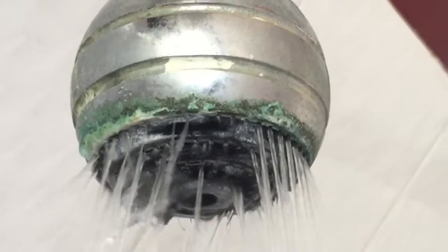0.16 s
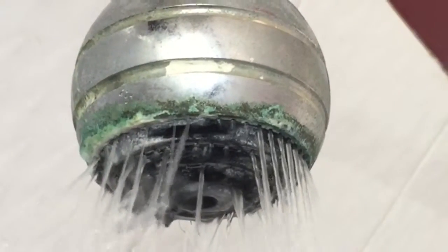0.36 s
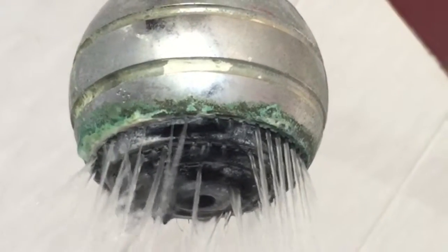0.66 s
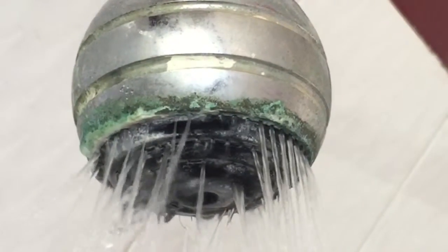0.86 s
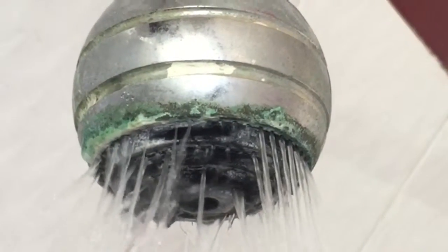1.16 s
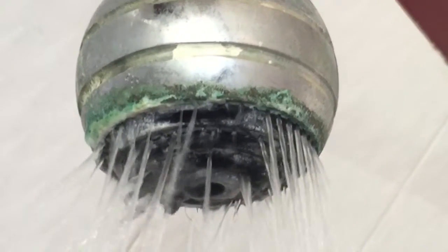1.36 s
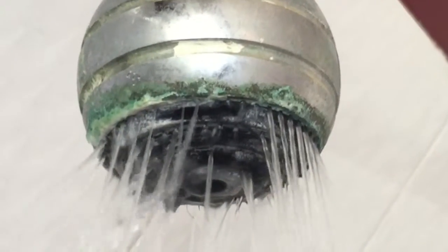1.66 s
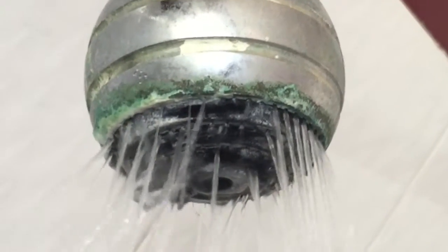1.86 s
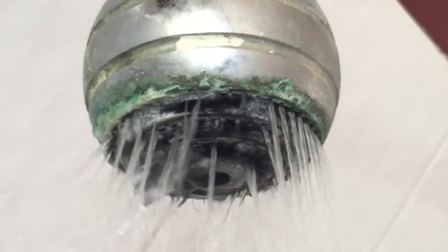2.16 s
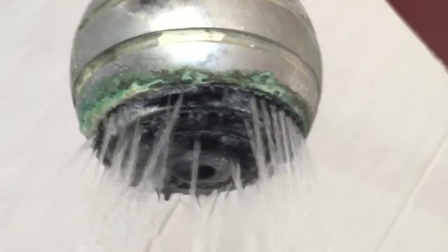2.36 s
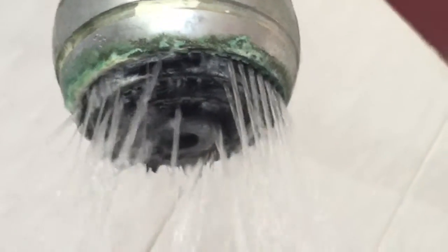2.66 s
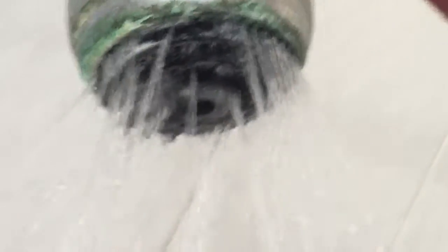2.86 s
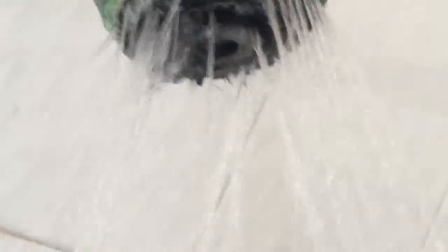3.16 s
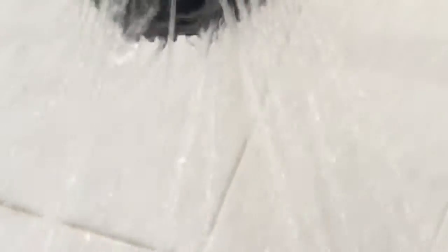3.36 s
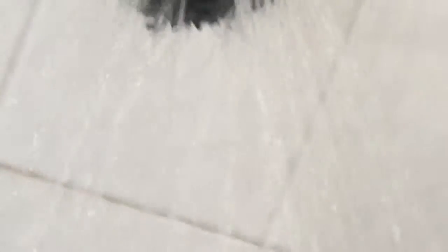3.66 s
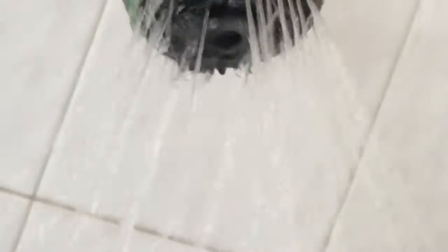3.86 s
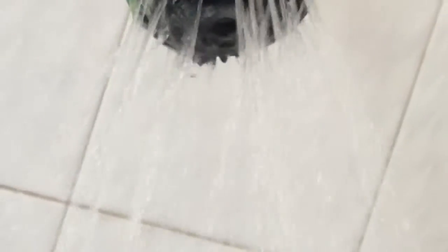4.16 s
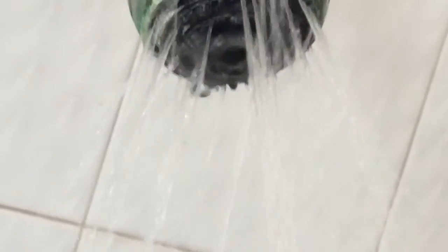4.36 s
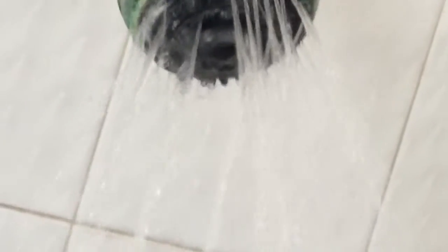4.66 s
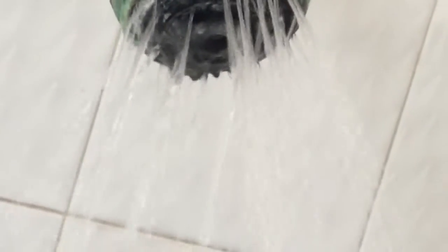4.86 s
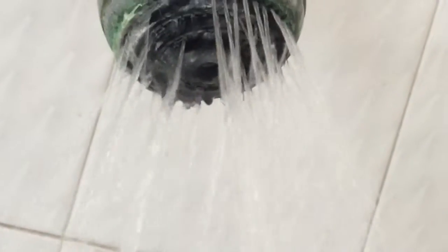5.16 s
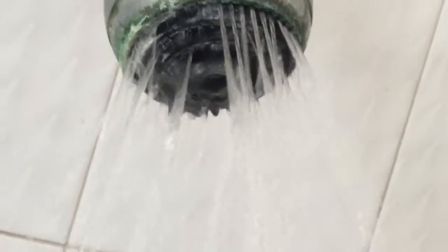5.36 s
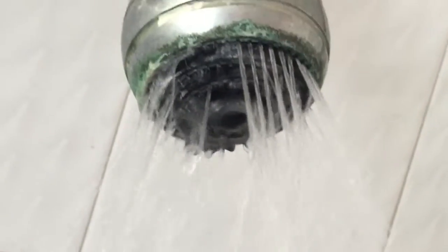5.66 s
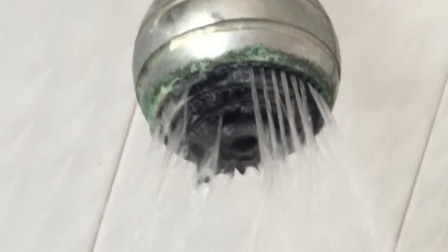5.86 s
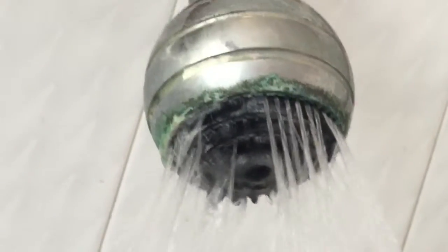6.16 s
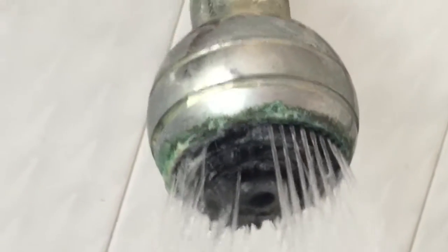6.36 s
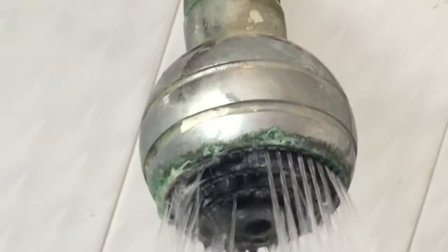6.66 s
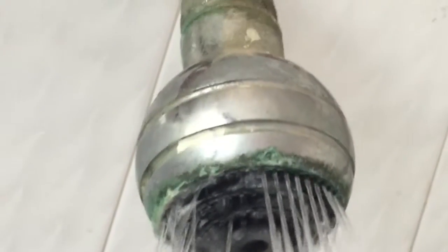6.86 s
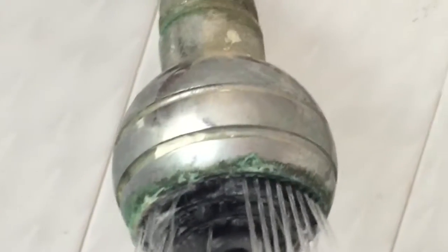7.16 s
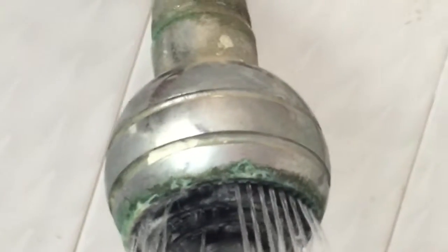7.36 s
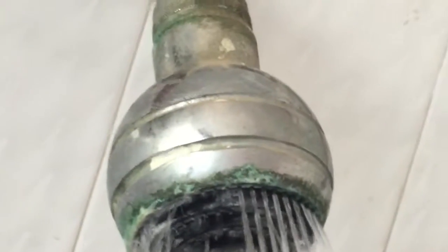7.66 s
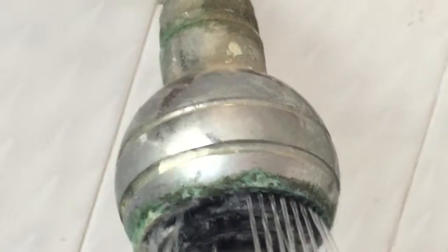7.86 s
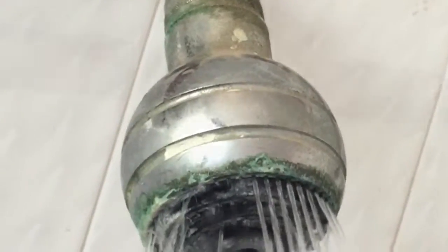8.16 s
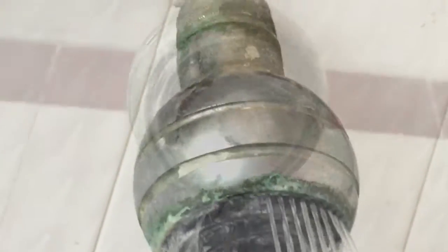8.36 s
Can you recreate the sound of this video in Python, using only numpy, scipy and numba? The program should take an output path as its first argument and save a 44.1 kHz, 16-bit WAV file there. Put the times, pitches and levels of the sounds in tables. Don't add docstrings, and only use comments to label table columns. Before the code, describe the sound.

Bright, hissing shower spray runs nonstop with sputtering bubbles, tiny crackles and a soft low drumming of water on a hard bathroom floor.

```python
import sys
import numpy as np
from scipy import signal
from scipy.fft import rfft, irfft
from scipy.io import wavfile
from scipy.ndimage import map_coordinates
from numba import njit

SR = 44100
rng = np.random.default_rng(int(sys.argv[2]) if len(sys.argv) > 2 else 0)


def amplitude_ratio(level_db):
    exponent = np.asarray(level_db, float) / 20
    return 10 ** exponent


def wrap_up_sound(samples):
    columns = np.atleast_2d(samples).T
    tamed = np.clip(columns, -1, 1)
    steps = np.round(tamed * 32767).astype(np.int16)
    wavfile.write(sys.argv[1], SR, steps)


N = 375732


def level(x, db):
    return x * amplitude_ratio(db) / np.sqrt(np.mean(x ** 2))


def band(x, hz, width_hz):
    return signal.lfilter(*signal.iirpeak(hz, hz / width_hz, fs=SR), x)


def highpass(x, order, hz):
    return signal.sosfilt(signal.butter(order, hz, "high", fs=SR, output="sos"), x)


def curve(table):
    s, *columns = np.transpose(table)
    return [np.interp(np.arange(N) / SR, s, c) for c in columns]


def wander(count):
    return np.interp(np.arange(N), np.linspace(0, N, count), rng.standard_normal(count))


def exponential_luck(uniform, limit):
    return np.minimum(-np.log(1 - uniform), limit)


@njit
def bubbles(length, start, hz, cycles, size, glide):
    out = np.zeros(length + 4096)
    for k in range(len(start)):
        i = int(start[k])
        if i < 0 or i >= length or size[k] < 3e-5:
            continue
        step = hz[k] / SR
        life = min(int(2 * cycles[k] / step) + 2, 4000)
        turn = np.exp(2j * np.pi * step - 3 * step / cycles[k])
        rise = np.exp(2j * np.pi * step * glide / life)
        z = size[k] * np.exp(2j * np.pi * step * (i + 1 - start[k]))
        for j in range(life):
            out[i + 1 + j] += z.imag * min(1., (j + 1) * step)
            z *= turn
            turn *= rise
    return out[:length]


def ring(s, hz, cycles, db, glide):
    hz = np.clip(hz, 500, .4 * SR).ravel()
    return bubbles(N, SR * s.ravel(), hz, cycles * np.ones(hz.size), amplitude_ratio(db).ravel(), glide)


# start in seconds, rise in dB, length in seconds.
DRAIN_SWELLS = [
    (1.092, 14, 0.16),
    (2.79, 14, 0.089),
    (3.2, 7, .45),
    (4.7, 10, 0.5),
    (5.3, 14, 0.08),
    (7.798, 7, 0.14),
]


def drain_pipe():
    s, rise_db, length = np.transpose(DRAIN_SWELLS)[:, :, None]
    part = np.clip((np.arange(N) / SR - s) / length, 0, 1)
    swell_db = (rise_db * np.sqrt(np.abs(np.sin(np.pi * part)))).sum(axis=0)
    hum = band(rng.standard_normal(N), 620.5, 16)
    return level(hum, -10.0) * amplitude_ratio(-54 + swell_db)


# frequency in Hz, width in Hz, level in dB.
ROOM_MODES = [(68, 8.4, -64), (95.4, 45, -52.5), (102, 38, -62.5), (134, 13, -93), (158.1, 7.5, -53),
              (180, 9.4, -65), (196.5, 23, -56), (214.5, 4.9, -60.5), (269.3, 20, -68.5),
              (294.5, 12, -65.5), (321.6, 18.4, -62)]
# time in seconds, level in dB.
DRUM = [(0.0, -47.5), (0.55, -49.5), (0.62, -53), (0.78, -46), (1.07, -51), (1.9, -45.5), (1.92, -51),
        (5.1, -49), (5.6, -54), (6.05, -46.5), (6.19, -52.5), (6.57, -49.5), (8.16, -49), (8.52, -54.5)]


def room_modes():
    weight_db, = curve(DRUM)
    weight_db = weight_db - weight_db.mean()
    low = amplitude_ratio(weight_db + 1.0 * wander(count=24))
    high = amplitude_ratio(weight_db + 1.0 * wander(count=24))
    out = np.zeros(N)
    for hz, width_hz, db in ROOM_MODES:
        noise = rng.standard_normal(N)
        mode = band(band(noise, hz, width_hz), hz, 2 * width_hz)
        out += (low if hz < 125 else high) * level(mode, db)
    return out


# frequency in Hz, density in dB per Hz.
RUMBLE = [(15, -54), (25, -2.5), (80, -6.5), (167, -2), (207, -5.5), (256, -3.5), (323, -27.5), (366, -6.5),
          (505, -8), (615, -5), (819, -8.5), (1710, -10.5), (1800, -10), (2340, -6.5), (3960, -120)]


def floor_drumming():
    hz, db = np.transpose(RUMBLE)
    f = np.arange(N // 2 + 1) * SR / N + 1
    colour = amplitude_ratio(np.interp(np.log(f), np.log(hz), db))
    broad = irfft(rfft(rng.standard_normal(N)) * colour, N)
    patter = highpass(broad, 2, 750)
    flow, coarse = curve(FLOW)
    uneven_db = 0.27 * (flow - flow.mean() + 2 * coarse) + 3.0 * wander(count=50)
    broad = broad + patter * (amplitude_ratio(uneven_db - 4.0) - 1)
    return level(broad, -49.5)


# time in seconds, flow in dB, coarseness of the drops in dB.
FLOW = [(0.0, -30, 7), (0.38, -36, 3.5), (0.76, -33, 4), (1.47, -30, 4), (1.87, -31.5, 2.5), (2.49, -29, 6),
        (2.75, -33.5, 4), (2.92, -33, 2), (3.13, -29, 4.5), (3.92, -34, 5), (4.39, -30.5, 4.5),
        (4.77, -32.5, 3.5), (5.62, -33, 2.5), (5.74, -29, 0), (6.36, -31.5, 6.5), (6.9, -31.5, 2),
        (7.43, -31.5, 5), (8.52, -32.5, 3)]
JET_HZ = [1200, 2900, 5800, 12000]


def jets(count=170000):
    when, pitch, size = rng.random((3, count))
    octave = np.log2(1000) + 4.0 * pitch ** .75
    flow, coarse = (c - c.mean() for c in curve(FLOW))
    sample = (when * N).astype(int)

    def layer(mean_db, per_coarse):
        layer_db = mean_db + per_coarse * coarse + flow - wander(count=40)
        return layer_db[sample]

    splash, spray, mist = layer(-40, 2.2), layer(-28, 1), layer(-24.5, -.4)
    rows = np.array([splash - 10, splash - 3, spray - 3, mist - 2.5])
    place = np.interp(octave, np.log2(JET_HZ), np.arange(4))
    db = map_coordinates(rows, [place, np.arange(count)], order=1)
    luck_db = 2.67 * exponential_luck(size, 5.0)
    return ring(when * N / SR, 2 ** octave, 4.7, db - 6.5 + luck_db, 0.096)


def spits(table, mist_db, spread, cycles, glide, count):
    s, db, hz, t60 = np.transpose(table)[:, :, None]
    when, pitch, other, size = rng.random((len(table), 4, count)).transpose(1, 0, 2)
    when = .4 * when ** 1.3
    opening_db = 20 * np.log10(np.minimum(.5 + when / 0.033, 1))
    fade_db = -60 * when / np.clip(t60, .03, 3) + opening_db
    size_db = db + fade_db + 2.7 * exponential_luck(size, 4.5) + 3.5
    bubble_hz = hz * 2 ** (3.04 * spread * (pitch + other - 1))
    ring_db = -10 * np.log10(cycles * count / bubble_hz)
    cloud = ring(s + when, bubble_hz, cycles, size_db + ring_db + 4.5, glide)
    mist = ring(s + 0.000698 + when, 8000 * 2.1 ** pitch, 2.82, size_db + mist_db + 8.5, 0.43)
    return cloud + mist


# start in seconds, level in dB, pitch in Hz, t60 in seconds.
GURGLES = [(.275, -40.5, 2570, .98), (.357, -36.5, 2910, 0.91), (.897, -41, 3020, 0.52),
           (1.499, -40, 2720, 0.72), (1.82, -40, 3400, 0.47), (2.042, -34.5, 2660, 0.85),
           (2.353, -34.5, 2680, 0.55), (2.977, -30, 2650, 0.58), (4.597, -42, 2960, 1),
           (4.141, -36, 3330, .77), (4.456, -35, 1610, 0.047), (5.66, -37.5, 3320, 0.88),
           (6.27, -30, 2550, 0.48), (6.492, -35, 3730, 0.89), (7.1, -48.5, 2370, 0.91)]
# start in seconds, level in dB, pitch in Hz, t60 in seconds.
POCKETS = [(2.366, -37.5, 1265, 0.051), (2.604, -40, 1440, 0.076), (3.335, -45, 940, 0.073),
           (3.35, -48, 1920, 0.36), (3.36, -44.5, 1415, .4), (3.43, -50, 1340, .22),
           (2.795, -41, 3650, 0.54), (3.845, -35, 3040, 0.35), (3.905, -46, 3180, 0.37),
           (4.141, -34.5, 3630, .5), (4.52, -39.5, 1970, 0.048), (6.68, -41, 3970, 0.53),
           (7.722, -42.5, 2530, 0.38), (7.722, -36, 4240, 0.28)]


def gurgles_and_pockets():
    ringing = dict(mist_db=-40, cycles=15.0, glide=.05, count=700)
    gurgles = spits(GURGLES, spread=0.239, **ringing)
    return gurgles + spits(POCKETS, spread=.055, **ringing)


# start in seconds, level in dB, bubble pitch in Hz, t60 in seconds.
COARSE_SPITS = [(.003, -33, 4260, 0.29), (.221, -34.5, 4160, 0.48), (.897, -33, 4060, 0.64),
                (1.499, -36, 4350, 0.67), (1.82, -37, 4950, 0.73), (2.042, -31, 4900, .99),
                (2.48, -33, 3570, 0.6), (2.507, -31, 3900, .99), (3.253, -34, 4840, 0.25),
                (3.765, -39, 4020, 0.98), (4.076, -38.5, 4730, 0.29), (5.08, -31, 6170, 0.7),
                (5.381, -38, 6000, 0.26), (5.651, -35.5, 6300, .99), (6.028, -34, 5050, 0.34),
                (7.099, -40, 4800, 0.48), (7.309, -34, 6200, 0.38), (7.457, -36.5, 6770, 0.76),
                (7.529, -37.5, 4020, 0.82), (7.923, -33.5, 6250, .37)]
# start in seconds, level in dB, bubble pitch in Hz, t60 in seconds.
MIXED_SPITS = [(.085, -37, 4950, .99), (.275, -34, 4100, 1), (.355, -34.5, 4250, 0.99),
               (.439, -34, 4380, 1), (.591, -38, 7700, 1), (1.045, -44, 6300, 0.46),
               (1.179, -35.5, 7900, 0.64), (1.441, -34, 6000, 0.6), (1.57, -37, 6200, 0.99),
               (2.012, -33.5, 5600, 0.92), (2.353, -28.5, 5000, 0.47), (2.792, -38.5, 4170, 0.67),
               (2.934, -40.5, 6400, .96), (2.977, -29.5, 6000, 0.56), (3.628, -41.5, 7400, .55),
               (3.805, -37, 5000, 0.84), (4.908, -38.5, 6100, 0.73), (5.928, -36, 5900, .96),
               (5.959, -34.5, 4540, 0.77), (6.2, -37, 5000, .99), (6.708, -47, 8500, 1),
               (6.82, -45, 5030, 0.41), (7.237, -35, 6000, 0.79), (8.209, -38.5, 5500, .99),
               (8.371, -41, 5000, 0.33)]
# start in seconds, level in dB, bubble pitch in Hz, t60 in seconds.
FINE_SPITS = [(2.408, -39.5, 11700, 0.87), (2.605, -45, 7460, 0.46), (3.331, -43.5, 3560, 0.83),
              (3.474, -40, 7870, .99), (3.738, -36.5, 12500, 1), (3.985, -45, 8500, .55),
              (4.141, -39.5, 6600, .99), (4.456, -32, 13100, .07), (4.457, -35, 6630, 0.23),
              (5.495, -42, 7120, 0.35), (5.612, -39, 6000, 0.48), (6.322, -36, 6100, .39),
              (6.492, -36, 5760, 0.49), (6.674, -39.5, 4330, 0.85), (7.152, -39.5, 6240, 0.51),
              (7.72, -38.5, 6400, 0.82), (7.85, -40, 6150, 0.41), (6.78, -43, 10900, 0.93),
              (6.98, -45, 12000, 0.53), (8.28, -40.5, 9000, 0.34), (8.477, -46, 9500, 0.38)]
# start in seconds, level in dB, bubble pitch in Hz, t60 in seconds.
TIGHT_SPITS = [(.085, -39, 13000, 1), (.591, -39, 9000, .6), (.885, -36.5, 5940, 0.29),
               (1.103, -39, 6200, 0.62), (1.179, -39, 13000, .6), (1.31, -41, 6700, .4),
               (1.441, -45, 8800, .5), (2.53, -40, 6300, .4), (2.605, -23.5, 11800, 0.1),
               (3.02, -38.5, 8800, 0.68), (7.04, -39, 12200, 0.71), (7.07, -42, 5240, 0.45),
               (7.865, -39, 14500, .4), (8.225, -40, 15000, .4), (1.25, -50, 6100, .51),
               (1.361, -34.5, 5100, 0.5), (2.13, -30, 4520, 0.39), (3.44, -43, 4340, 0.45),
               (4.29, -39, 6200, 1), (4.595, -31, 4640, 0.71), (5.15, -38, 4700, 0.94),
               (6.2, -47, 3840, 0.8), (6.27, -35.5, 2620, 0.97), (6.708, -33.5, 6600, 0.82),
               (6.82, -42, 4100, .4), (6.905, -39.5, 6670, 0.33), (7.589, -35, 5400, .36),
               (8.109, -36.5, 5100, .97)]


def air_spits():
    free = dict(cycles=9.0, glide=.12, count=1200)
    coarse = spits(COARSE_SPITS, mist_db=-12, spread=0.353, **free)
    mixed = spits(MIXED_SPITS, mist_db=-3, spread=0.356, **free)
    fine = spits(FINE_SPITS, mist_db=4.6, spread=.38, **free)
    tight = spits(TIGHT_SPITS, mist_db=-17.5, spread=0.15, **free)
    return coarse + mixed + fine + tight


# start in # seconds,
# level in dB, pitch in Hz.
CRACKS = [(1.3751, -21.2, 5500.0), (1.4994, -16.0, 5400.0), (2.0128, -17, 5900.0), (2.3542, -16.7, 6000.0),
          (2.3695, -18, 12000), (2.415, -21, 11000), (2.6065, -16.2, 10100.0), (2.6119, -17.4, 9900.0),
          (2.6177, -17.9, 10100.0), (2.9773, -17.4, 3000), (3.7394, -17, 12000.0), (3.743, -20.2, 11500.0),
          (3.7524, -17, 12300.0), (3.7663, -23, 4300), (4.0772, -23.9, 6300.0), (4.1417, -18.5, 4500.0),
          (4.145, -19.4, 3700.0), (4.459, -19, 11500.0), (4.521, -24, 9000), (4.5965, -16, 4800.0),
          (4.5994, -16.6, 4400.0), (4.6078, -17.5, 5300.0), (5.0811, -15.4, 7200.0),
          (5.0836, -18.9, 7300.0), (5.0938, -18.7, 6800.0), (6.2699, -21, 4500), (6.2736, -18.2, 3100.0),
          (6.4928, -18, 5300.0), (6.4957, -18.1, 4600.0), (8.1096, -25, 6300.0)]


def film_cracks(count=4):
    s, db, hz = np.transpose(CRACKS)[:, :, None]
    order = (np.arange(count) + rng.random((len(CRACKS), count))) / count
    when = s + 5e-4 * order
    short_db = 3.5 * np.log2(hz / 5000)
    snap_db = db + short_db + 13.5 + 0 * when
    return ring(when, hz * 2 ** (.5 - order), 1.47, snap_db, .05)


def tiles(x, count=48):
    t60_s, top_hz, tail_db = .55, 7140, -8
    t = np.arange(SR // 2) / SR
    out = np.zeros(N + SR)
    for part in np.array_split(np.arange(N), count):
        noise = rng.standard_normal(len(t)) * np.minimum(t / 0.0018, 1)
        dull = signal.lfilter(*signal.butter(1, top_hz, fs=SR), noise)
        bright = noise - dull
        tail = dull * amplitude_ratio(-60 * t / t60_s) + bright * amplitude_ratio(-120 * t / t60_s)
        tail = tail / np.linalg.norm(tail)
        out[part[0]:part[-1] + len(t)] += signal.fftconvolve(x[part], tail)
    return out[:N] * amplitude_ratio(tail_db)


def scene():
    background = floor_drumming() + room_modes() + drain_pipe()
    spray = jets() + air_spits() + film_cracks()
    water = highpass(spray, 3, 1700) + gurgles_and_pockets()
    return np.tile(water + tiles(water) + background, (2, 1))


def top_cut(x):
    return signal.sosfilt(signal.butter(12, 15830, fs=SR, output="sos"), x)


# frequency in Hz, width in Hz, depth from 0 to 1.
DIPS = [
    (4900, 450, .45),
    (7600, 900, .3),
    (10400, 800, .45),
]


def record(dry):
    for hz, width_hz, depth in DIPS:
        dry = dry - depth * band(dry, hz, width_hz)
    dry = highpass(dry, 4, 42)
    dry = signal.sosfilt(signal.ellip(12, .3, 45, 15780, fs=SR, output="sos"), dry)
    return top_cut(dry)


dry = scene()
out = record(dry)
wrap_up_sound(out)
```